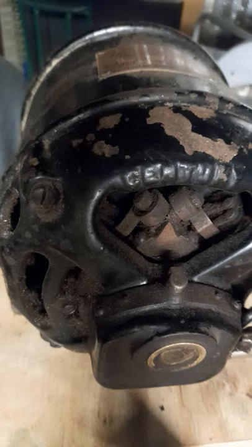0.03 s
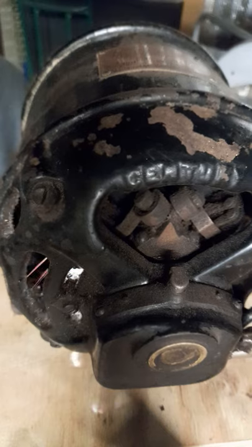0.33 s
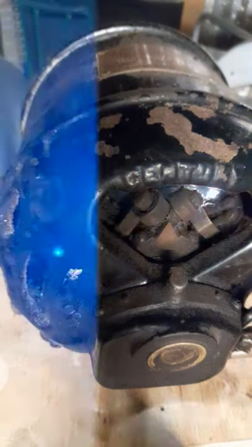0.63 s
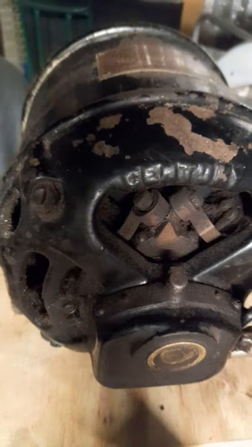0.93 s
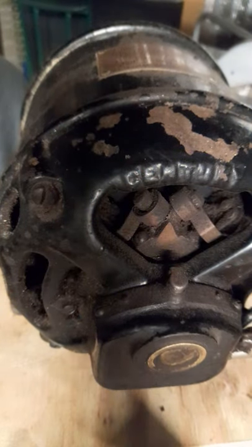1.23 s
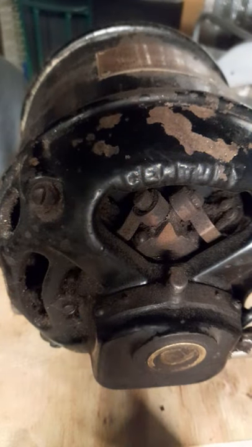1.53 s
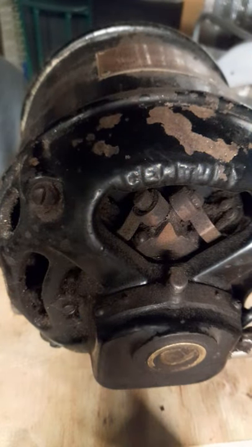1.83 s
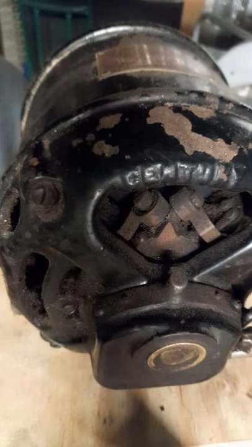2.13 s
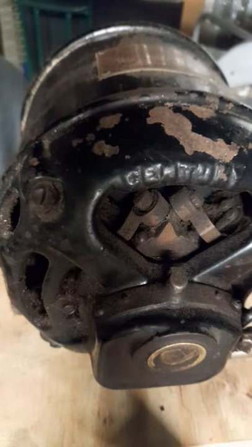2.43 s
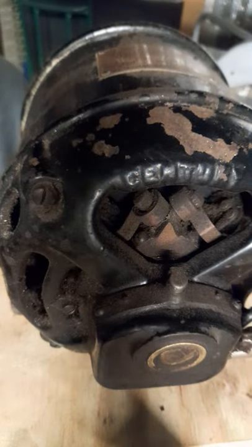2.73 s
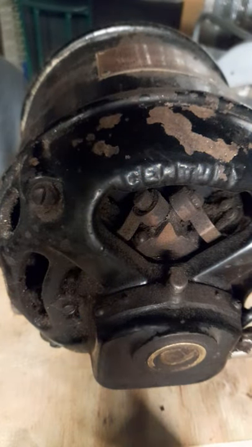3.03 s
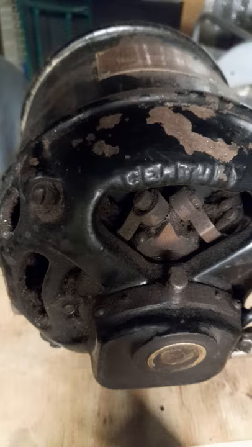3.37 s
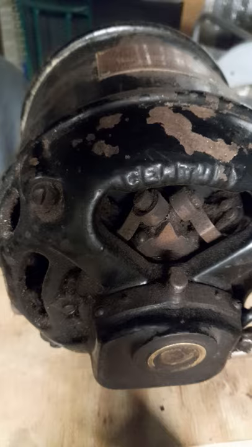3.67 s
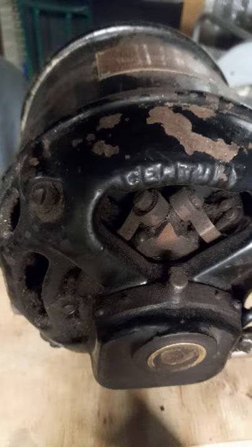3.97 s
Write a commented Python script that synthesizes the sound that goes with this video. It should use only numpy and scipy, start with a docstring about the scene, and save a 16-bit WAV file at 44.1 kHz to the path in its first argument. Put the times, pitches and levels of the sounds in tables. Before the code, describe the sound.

An old electric motor starts close by with a click, a rattling growl and half a second of harsh, popping sparks. The sparking stops, there is a sharp click, and a steady low hum continues with faint whirring.

```python
"""An old brush-started motor is switched on, close by on a workshop bench. For half a second the
starting current shakes its frame into a growl, while the brushes arc and sizzle at every mains peak.
Then the sparking stops, the brush gear clicks, and the periodic magnetic pull leaves a mains hum with
rotor-slot whine, over a faint whirr of bearings and the scrape of the riding brushes.
An automatic gain control ducks at the loud start and slowly recovers."""
import sys
import numpy as np
from scipy import signal
from scipy.fft import rfft, irfft
from scipy.io import wavfile
from scipy.ndimage import minimum_filter1d, map_coordinates

SR = 44100
rng = np.random.default_rng(int(sys.argv[2]) if len(sys.argv) > 2 else 0)


def dump(signal):
    """Clip the signal to [-1, 1] and save it as 16-bit WAV at the path in sys.argv[1]."""
    limited = np.clip(np.atleast_2d(signal).T, -1, 1)
    pcm = np.round(limited * 32767).astype(np.int16)
    wavfile.write(sys.argv[1], SR, pcm)


N = 176400

PULL_HZ, SHAFT_HZ = 100.1, 24.76  # magnetic pull (twice per mains cycle); full shaft speed
ON_S, RUNNING_S = .331, .81  # start and end of the run-up
BURST_RISE_S = .0005

# running tones: (multiple of shaft rate, multiple of pull rate, level [dB], left minus right [dB])
MOTOR_TONES = [(0, 1, -20.5, 0), (1, 1, -50, -15), (0, 2, -38.5, 2), (5, 1, -43, -4.5), (7, 1, -57, -8),
               (0, 3, -35.5, -7.5), (5, 2, -45, -1), (6, 2, -51, -10), (7, 2, -56, -14), (0, 4, -60.5, -16),
               (5, 3, -56, -6.5), (6, 3, -66, -0.5), (0, 5, -68, 1), (23, 0, -62.5, 2), (0, 7, -64.5, -1.5),
               (37, -1, -54, 10), (34, 0, -63.5, -9), (35, 0, -59, 5.5), (36, 0, -65, -5),
               (37, 0, -41.5, -14), (34, 1, -62, -2.5), (35, 1, -56, 2.5), (36, 1, -82, 8),
               (37, 1, -43.5, -3), (38, 1, -61.5, -9.5), (37, 2, -56.5, -4), (37, 3, -61, 3.5),
               (68.2, 0, -69.5, -1.5), (69.6, 0, -71.5, -8.5), (74.3, 0, -62, 3), (74.54, 0, -64, -3),
               (73, 1, -77, -6), (74, 2, -69.5, 8.5), (74.72, 3, -66.5, -2.5), (106.5, 0, -65, -8.5)]
# phase of those tones, left ahead of right: (frequency [Hz], lead [rad])
LEFT_LEAD = [(100, .06), (220, -.2), (300, -1.2), (330, -.5), (600, .3), (915, 1.1), (970, 1.4), (1016, .4),
             (1800, -.4), (2100, -2)]
# envelope of the hum as the rotor pulls up to speed: (time [s], gain [dB])
HUM_ENVELOPE = [(.79, -21.5), (.83, 1), (.86, 3), (.92, -0.5), (.98, -3.5), (1.05, -2.5)]
# envelope of the growl: (time [s], level [dB])
GROWL_ENVELOPE = [(.331, -55), (.35, -43), (.368, -15), (.40, -18), (.46, -22), (.50, -30), (.62, -34.5),
                  (.78, -32), (.83, -43), (.9, -70)]
# harmonics of the growl: (multiple of pull rate, relative level [dB])
GROWL_HARMONICS = [(1, 1), (2, -7), (3, -2.5), (4, -5), (5, -15), (6, -17)]
# spectrum of the rattling frame: (frequency [Hz], relative level [dB])
RATTLE_SPECTRUM = [(80, -25), (160, -6), (230, -4), (320, 2), (420, 2), (570, -9), (750, -18), (2000, -40),
                   (8000, -70.5)]
# loud arcs: (time [s], relative pop level [dB], relative crackle level [dB])
LOUD_ARCS = [(.3672, -12, -18), (.3870, -22, -14.5), (0.397, -7.5, -17.5), (0.4167, -8, -17),
             (0.426, -26, -17), (0.4349, -12.5, -15), (0.4569, -19.5, -25.5), (0.462, -21.5, -14),
             (0.473, -29, -18), (0.4827, -26.5, -18), (0.5047, -15.5, -15.5), (0.5114, -22, -22),
             (.5260, -5, -17.5), (.5455, -11, -16), (.5640, -15.5, -15.5), (.5840, -16, -17),
             (.6150, -12, -16), (0.6268, -10, -17.5), (0.6309, -20, -16), (0.635, -19.5, -16),
             (0.6638, -11, -11.5), (0.6943, -18, -16), (0.7252, -13, -15.5), (0.7417, -24, -19),
             (.7535, -20.5, -17.5), (.7630, -19.5, -20), (0.7846, -25, -16), (.8360, -24.5, -42)]
# envelope of the fine sparking: (time [s], level [dB])
SIZZLE_ENVELOPE = [(.331, -42), (.36, -38), (.39, -28), (.46, -24), (.497, -28.5), (.54, -20.5),
                   (.607, -22), (.66, -17), (.72, -15), (.804, -18.5), (.812, -36), (.86, -61),
                   (.95, -75.5), (.98, -88)]
# clicks of the switch and brush gear: (time [s], level [dB])
GEAR_CLICKS = [(0.3312, -19.5), (0.9998, -21.5), (1.102, -51), (1.1814, -46.5), (1.2613, -51.5),
               (1.3417, -48), (2.4062, -47)]
# spectrum of an arc's pop: (frequency [Hz], relative level [dB])
POP_SPECTRUM = [(60, -14.5), (150, 0), (250, 0.5), (400, 5), (700, -1), (1200, 2), (1800, -3.5),
                (2600, -19.5), (5000, -24.5), (16000, -44)]
# spectrum of sizzle, crackle and clicks: (frequency [Hz], relative level [dB])
SPARK_SPECTRUM = [(100, -18), (400, 0), (1200, -4), (2200, -5.5), (3200, -7.5), (4300, 0), (5500, -1.5),
                  (6400, -5), (7300, -3), (8500, -15), (10000, -9), (11600, -5.5), (13500, -7),
                  (15700, -14), (17000, -24.5)]
# stereo balance of sparks and clicks: (frequency [Hz], left minus right [dB])
SPARK_PAN = [(100, 0.5), (380, -4.5), (700, 2), (2400, 0.5), (4400, -0.5), (8100, 7), (15000, 3)]
# modes of the housing and brush gear: (frequency [Hz], T60 [s], relative level [dB])
HOUSING_MODES = [(231, .15, -40.5), (315.4, .12, -38), (402, .14, -33), (570, .16, -35.5), (1118, .1, -39),
                 (4494, .12, -45), (5200, 0.22, -44.5), (6050, .15, -48.5), (10638, .12, -48)]
# spectrum of bearings and air: (frequency [Hz], relative level [dB])
WHIRR_SPECTRUM = [(30, 1), (100, 6.5), (200, 3.5), (400, -2.5), (650, -6), (1000, -3), (1400, -16),
                  (1850, -10), (2300, -18), (3100, -25), (3600, -21), (4300, -26), (5100, -25),
                  (7000, -30.5), (8300, -36.5), (12000, -34.5), (15500, -33.5), (17000, -48)]
# brush-holder resonances: (frequency [Hz], bandwidth [Hz], level [dB], mean scrape rate [1/s])
HOLDER_MODES = [(3650, 360, -78, 90), (5050, 550, -74, 130), (6275, 400, -81.5, 60), (9220, 260, -85, 12)]
# spectrum of the background noise: (frequency [Hz], relative level [dB])
BACKGROUND_SPECTRUM = [(18, -39.5), (30, -10.5), (93, -2), (149, -8), (822, -20), (5900, -28.5),
                       (13700, -22.5), (16000, -29)]


def hum(t, pull, shaft, throb_db=5, throb_peak_s=2.8, whine_in_s=.8, whine_full_s=1.01):
    """Modulation: rotor slots and magnetic pull form sidebands; slip makes the low ones throb."""
    out, side = np.zeros((2, N)), np.array([[.5], [-.5]])
    slip_hz = PULL_HZ - 4 * SHAFT_HZ
    throb = undb(throb_db * np.cos(2 * np.pi * slip_hz * (t - throb_peak_s)))
    whine = np.clip((t - whine_in_s) / (whine_full_s - whine_in_s), 0, 1)
    for turns, pulls, db, pan_db in MOTOR_TONES:
        turns, pulls = round(turns), round(pulls)
        hz = turns * SHAFT_HZ + pulls * PULL_HZ
        waver_db = 2 if hz > 1500 else .5
        gain = undb(db + waver_db * wander(5.06) * (hz > PULL_HZ))
        if turns:
            gain *= throb if hz < 520 else whine
        phase = turns * shaft + pulls * pull + side * at_hz(hz, LEFT_LEAD)
        out -= gain * unit_rms(undb(side * pan_db)) * np.cos(phase)
    fade_in = np.clip((t - HUM_ENVELOPE[0][0]) * 20 + 1, 0, 1)
    return out * envelope(t, HUM_ENVELOPE) * fade_in


def growl(t, pull, rough_db=3, rattle_db=-3):
    """Forced vibration: the starting current shakes the frame at the pull's harmonics and rattles it."""
    shake = np.zeros(N)
    for k, db in GROWL_HARMONICS:
        flicker_db = rough_db * min((k - 1) / 2, 1) * wander(90)
        shake -= undb(db + flicker_db) * np.cos(k * pull)
    pulsing = stereo_noise(900) * np.exp(.6 * np.cos(pull))
    rattle = undb(rattle_db) * unit_rms(colour(pulsing, RATTLE_SPECTRUM))
    fade_out = np.clip((1 - t) * 10, 0, 1)
    return (shake + rattle) * envelope(t, GROWL_ENVELOPE) * (t > ON_S) * fade_out


def sparks_and_clicks(t, pull, pop_gain_db=19.5, crackle_gain_db=8):
    """Impulsive excitation: arcs pop and crackle, sizzle swells at each current peak, the gear clicks."""
    times, pop_db, crackle_db = np.array(LOUD_ARCS).T
    surges = unit_rms(np.exp(.9 * np.cos(pull)) * undb(2 * wander(220)))
    sizzle = envelope(t, SIZZLE_ENVELOPE) * surges * (t > ON_S) * (t < SIZZLE_ENVELOPE[-1][0])
    crackle = bursts(t, times, crackle_db + crackle_gain_db, fall_s=.0023)
    clicks = bursts(t, *np.array(GEAR_CLICKS).T, fall_s=.0014)
    grains = unit_rms(stereo_noise(700) * undb(4 * wander(5000)))
    grains *= np.sqrt(sizzle ** 2 + crackle ** 2 + clicks ** 2)  # incoherent sources add in power
    pops = np.zeros(N)
    pops[((times + BURST_RISE_S) * SR).astype(int)] = undb(pop_db + pop_gain_db)
    sound = room(housing(colour(grains, SPARK_SPECTRUM) + colour(pops, POP_SPECTRUM)))
    pan_db = at_hz(np.fft.rfftfreq(N, 1 / SR), SPARK_PAN)
    return irfft(rfft(sound) * undb(np.array([pan_db, -pan_db]) / 2), N) * (t > ON_S)


def housing(x):
    """Free vibration: the iron shell and brush holders ring in damped modes after each impulse."""
    t = np.arange(SR // 4) / SR
    ring = sum(undb(db - 60 * t / t60) * np.sin(2 * np.pi * hz * t) for hz, t60, db in HOUSING_MODES)
    return x + signal.fftconvolve(x, ring[None] / 10, axes=1)[:, :N]


def whirr(run_up, pull, shaft, level_db=-46, repeat_share=.44):
    """Friction noise of bearings and air partly repeats each turn and pulses with the magnetic pull."""
    size = int(SR / SHAFT_HZ)
    roughness = rng.standard_normal((2, size))
    position = shaft / (2 * np.pi) * size
    turning = np.array([map_coordinates(track, [position], mode="grid-wrap") for track in roughness])
    rub = np.sqrt(repeat_share) * turning + np.sqrt(1 - repeat_share) * rng.standard_normal((2, N))
    rub = merge_bass(rub, 250) * np.exp(.33 * np.cos(pull))
    rub *= undb(.5 * wander(30))  # slight flutter
    return undb(level_db) * colour(unit_rms(rub), WHIRR_SPECTRUM) * run_up


def brush_scrapes(t, spread_db=1.5, fall_s=.004):
    """Resonance: the riding brushes catch at random, and each short scrape rings their holders."""
    out, decay = np.zeros((2, N)), np.exp(-1 / (fall_s * SR))
    for hz, width, db, rate in HOLDER_MODES:
        catches = (rng.random(N) < rate / SR) * undb(spread_db * rng.uniform(-1, 1, N))
        rub = signal.lfilter([1], [1, -decay], catches + 1e-9) * stereo_noise(8000)
        out += undb(db) * unit_rms(signal.lfilter(*signal.iirpeak(hz, hz / width, fs=SR), rub))
    return out * (t > RUNNING_S)


def room(x, early_db=-4.5, tail_db=-9.5, low_t60_s=.45, high_t60_s=.21, split_hz=2000):
    """Reverberation: dense bench reflections precede a short tail that lasts longer in the bass."""
    t = np.arange(SR // 2) / SR
    low, high, early = rng.standard_normal((3, 2, len(t)))
    low = butterworth(low, 2, split_hz, "low") * undb(-60 * t / low_t60_s)
    high = butterworth(high, 2, split_hz, "high") * undb(-60 * t / high_t60_s)
    tail = undb(tail_db) * unit_rms((low + high) * (t > .005))
    early = undb(early_db) * unit_rms(early * np.exp(-t / .0033) * (t > .001))
    return x + signal.fftconvolve(x, (early + tail) / np.sqrt(len(t)), axes=1)[:, :N]


def background(level_db=-76.5):
    """Stationary noise: a faint rumble and hiss."""
    return undb(level_db) * colour(stereo_noise(300), BACKGROUND_SPECTRUM)


def undb(db):
    """Amplitude ratio of a level in decibels."""
    return 10 ** (np.asarray(db) / 20)


def unit_rms(x):
    """Normalisation to unit mean power."""
    return x / np.sqrt(np.mean(x ** 2))


def envelope(t, rows):
    """Amplitude interpolated through (time [s], level [dB]) points."""
    return undb(np.interp(t, *np.array(rows).T))


def bursts(t, times, levels_db, fall_s):
    """Superposition of envelopes with a linear rise and an exponential decay."""
    out = np.zeros(N)
    for start, db in zip(times, levels_db):
        age = np.maximum(t - start, 0)
        out += undb(db) * np.minimum(age / BURST_RISE_S, 1) * np.exp(-np.minimum(age / fall_s, 60))
    return out


def wander(rate_hz):
    """Interpolated Gaussian noise with a deviation near 1."""
    knots = rng.standard_normal(N // 4)
    return 1.31 * np.interp(np.arange(N) / SR * rate_hz, np.arange(len(knots)), knots)


def at_hz(hz, rows):
    """Interpolation of (frequency [Hz], value) points on a logarithmic axis."""
    freqs, values = np.array(rows).T
    return np.interp(np.log(np.maximum(hz, 1)), np.log(freqs), values)


def colour(x, rows, size=2048):
    """Minimum-phase filter of unit energy, shaped by (frequency [Hz], level [dB]) points."""
    magnitude = undb(at_hz(np.fft.rfftfreq(size, 1 / SR), rows))
    cepstrum = irfft(np.log(magnitude))
    cepstrum[1:size // 2] *= 2  # folding makes the response causal
    cepstrum[size // 2 + 1:] = 0
    ir = irfft(np.exp(rfft(cepstrum)))
    return signal.fftconvolve(np.atleast_2d(x), ir[None] / np.linalg.norm(ir), axes=1)[:, :N]


def butterworth(x, order, hz, kind):
    """Filter with a maximally flat passband."""
    return signal.sosfilt(signal.butter(order, hz, kind, fs=SR, output="sos"), x)


def merge_bass(pair, below_hz):
    """Mid-side mixing makes two independent noises coherent in the bass."""
    side = butterworth(pair[1], 1, below_hz, "high")
    return unit_rms(np.array([pair[0] + side, pair[0] - side]))


def stereo_noise(below_hz):
    """Broadband noise whose channels are coherent in the bass."""
    return merge_bass(rng.standard_normal((2, N)), below_hz)


def scene(settle_s=.8, stall_lag_s=.004):
    """Superposition: the motor's sounds follow the phases of magnetic pull and shaft as it runs up."""
    t = np.arange(N) / SR
    run_up = np.clip((t - ON_S) / (RUNNING_S - ON_S), 0, 1)
    shortfall = .0027 * np.exp(-np.maximum(t - RUNNING_S, 0) / settle_s)  # the last speed comes slowly
    speed = run_up * (1 - shortfall + .00018 * wander(3.3))
    shaft = 2 * np.pi * np.cumsum(speed) * SHAFT_HZ / SR
    lag_s = .0035 + stall_lag_s * (1 - run_up ** 2)  # the current peaks later at standstill
    starting_pull = 2 * np.pi * PULL_HZ * (t - lag_s)
    running_pull = 2 * np.pi * PULL_HZ * (t - .001)
    floor = background()
    starting = sparks_and_clicks(t, starting_pull) + growl(t, starting_pull)
    running = hum(t, running_pull, shaft) + whirr(run_up, running_pull, shaft) + brush_scrapes(t)
    return starting + running + floor


def record(dry, threshold_db=-24.5, range_db=5, hold_s=1.154, release_db_per_s=8.5, top_hz=15900):
    """Automatic gain control ducks at loud sound, holds and recovers; clipping and a low-pass follow."""
    t = np.arange(N) / SR
    power = signal.lfilter([1 / 441], [1, 1 / 441 - 1], np.mean(dry ** 2, axis=0))  # 10 ms average
    target_db = np.clip(threshold_db - 10 * np.log10(power + 1e-12), -range_db, 0)
    half = int(hold_s * SR / 2)
    held_db = minimum_filter1d(target_db, 2 * half + 1, origin=half, mode="nearest")
    gain_db = np.minimum.accumulate(held_db - release_db_per_s * t) + release_db_per_s * t
    clipped = np.clip(dry * undb(gain_db), -.9, .9)
    return signal.sosfilt(signal.ellip(8, .2, 80, top_hz, fs=SR, output="sos"), clipped)


dry = scene()
out = record(dry)
dump(out)
```